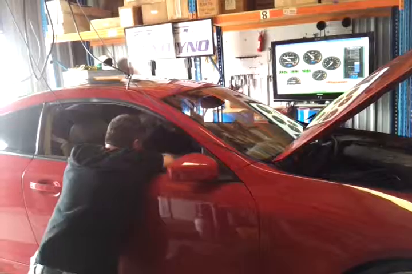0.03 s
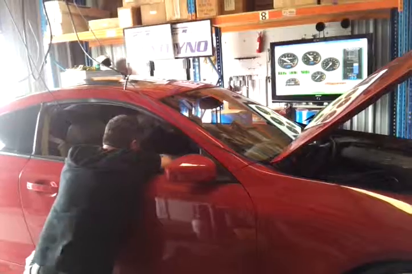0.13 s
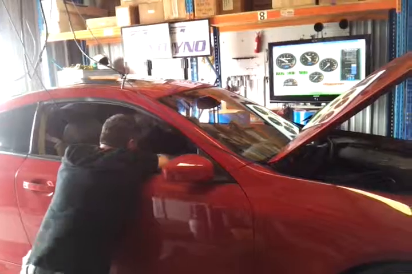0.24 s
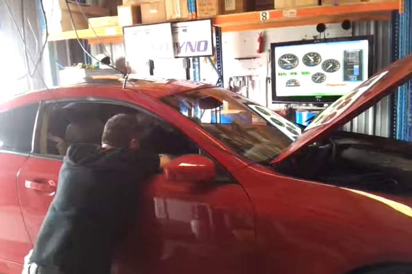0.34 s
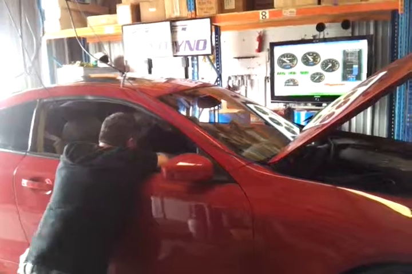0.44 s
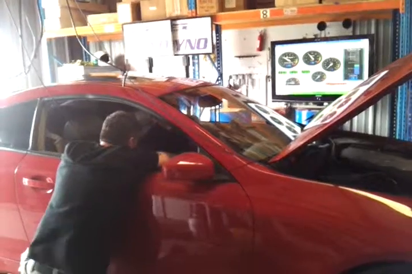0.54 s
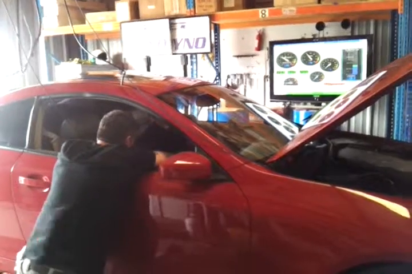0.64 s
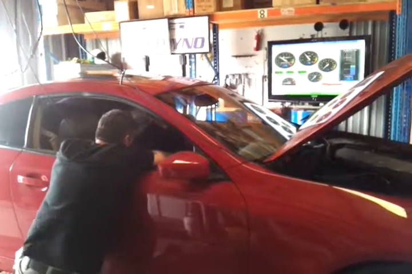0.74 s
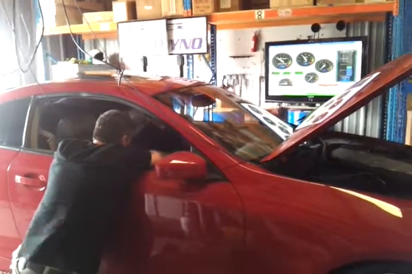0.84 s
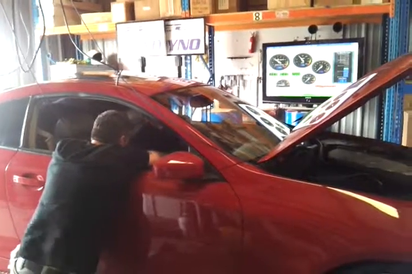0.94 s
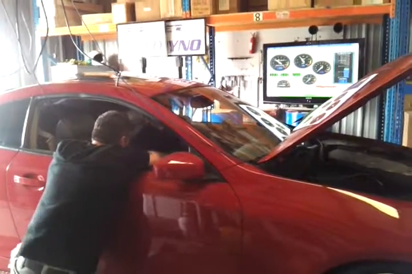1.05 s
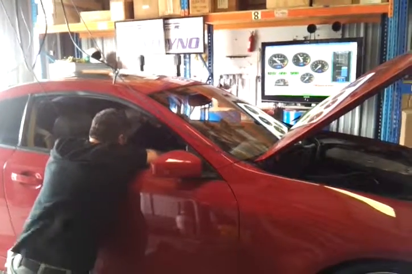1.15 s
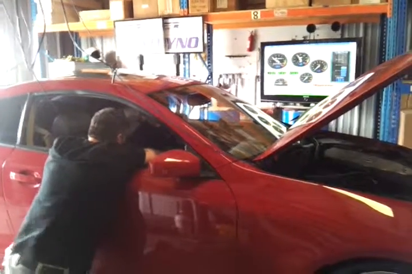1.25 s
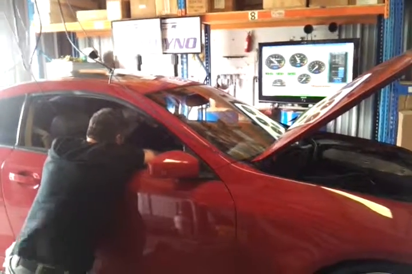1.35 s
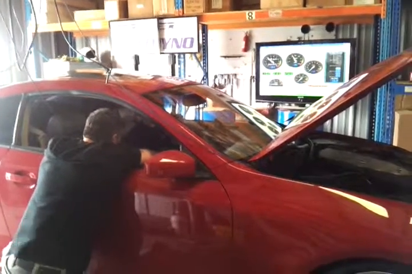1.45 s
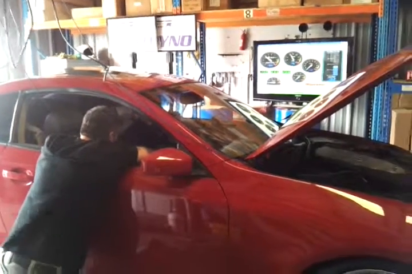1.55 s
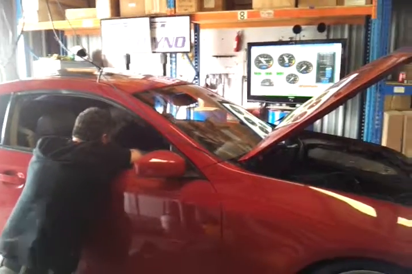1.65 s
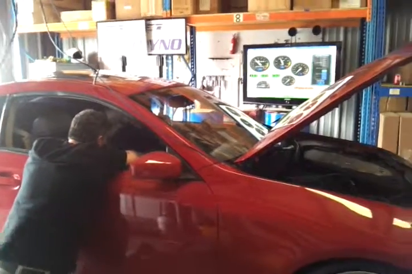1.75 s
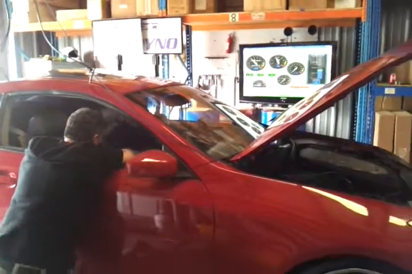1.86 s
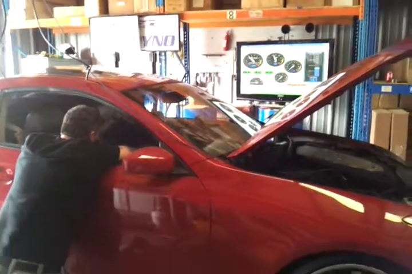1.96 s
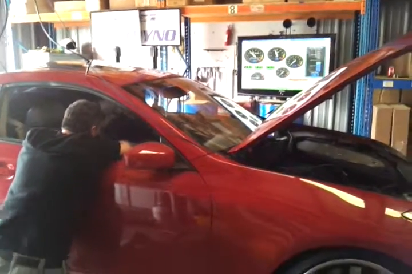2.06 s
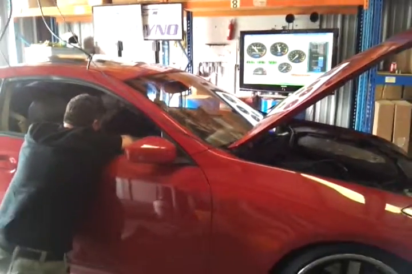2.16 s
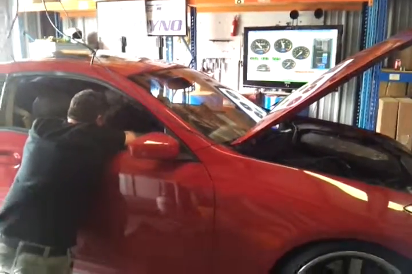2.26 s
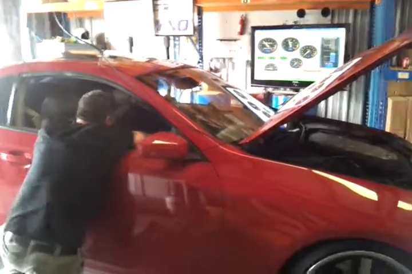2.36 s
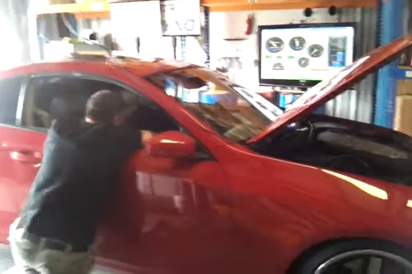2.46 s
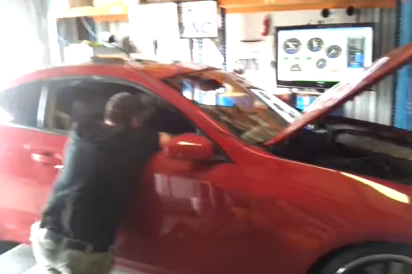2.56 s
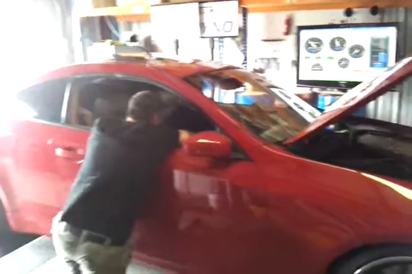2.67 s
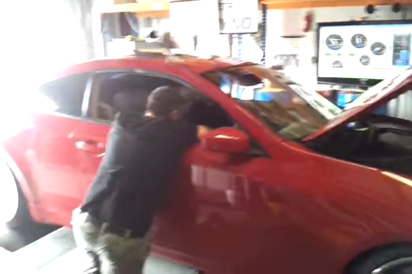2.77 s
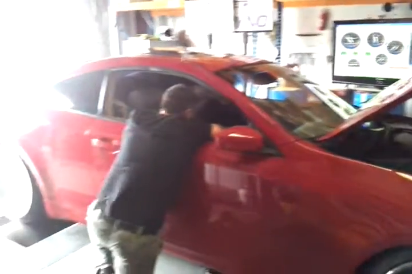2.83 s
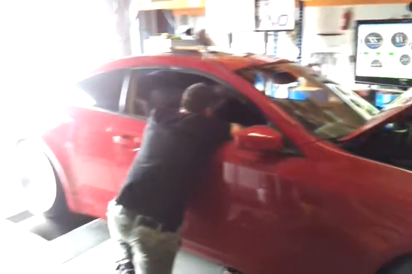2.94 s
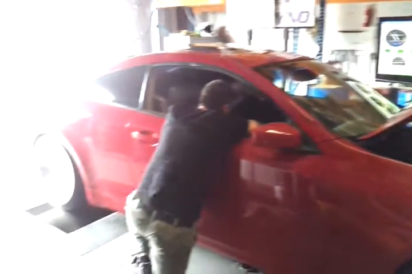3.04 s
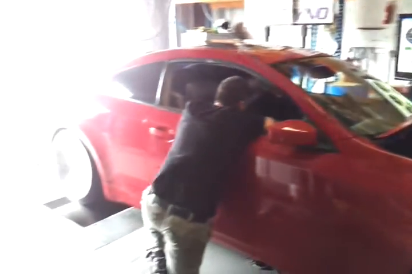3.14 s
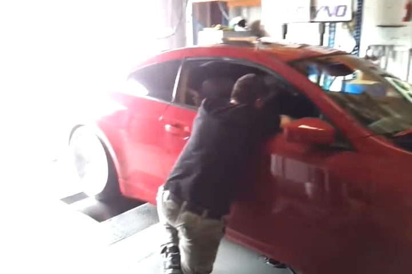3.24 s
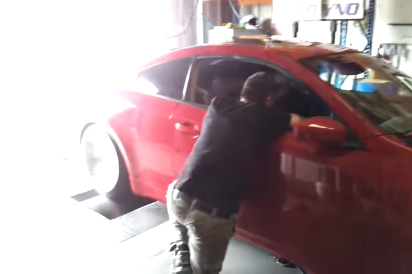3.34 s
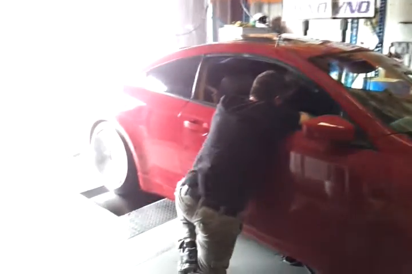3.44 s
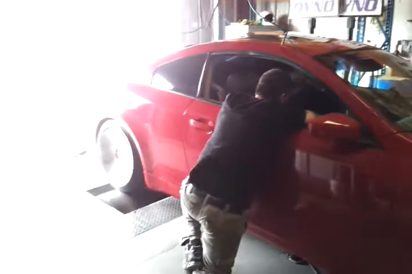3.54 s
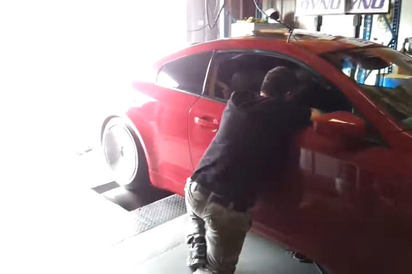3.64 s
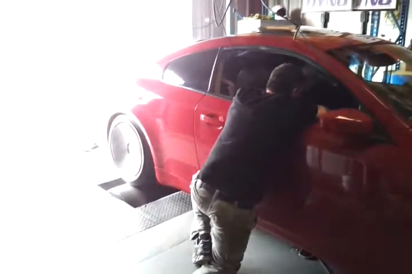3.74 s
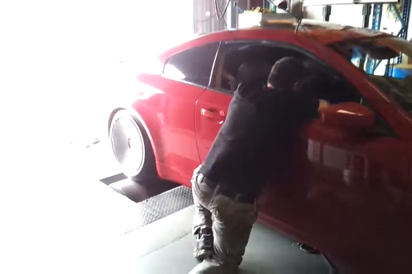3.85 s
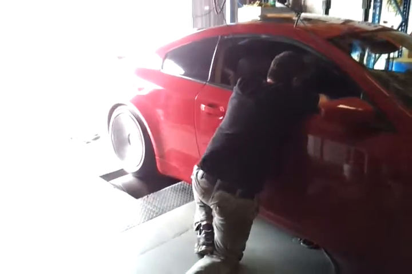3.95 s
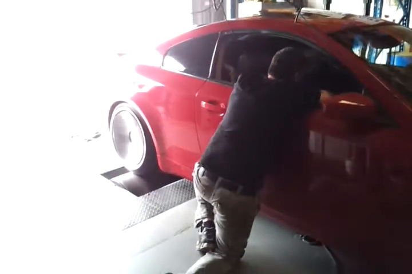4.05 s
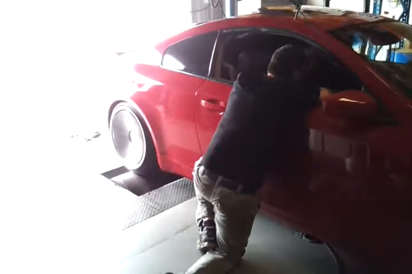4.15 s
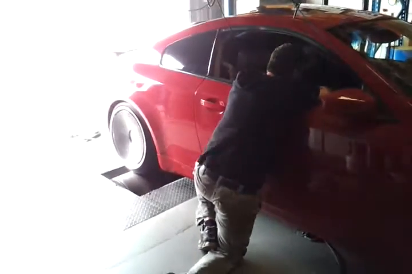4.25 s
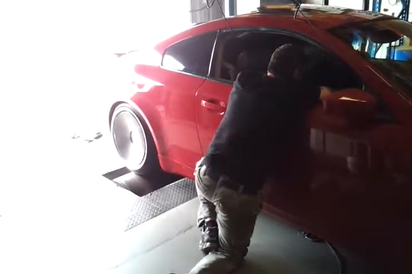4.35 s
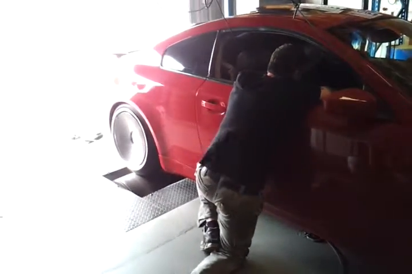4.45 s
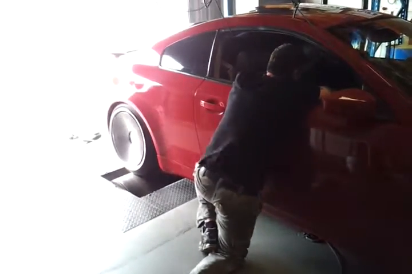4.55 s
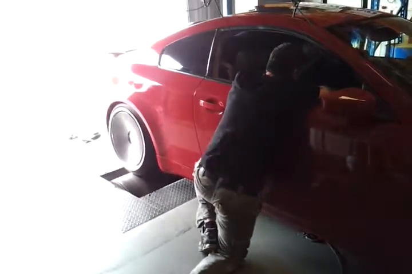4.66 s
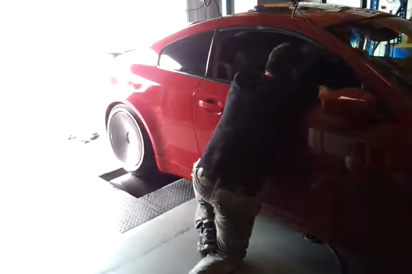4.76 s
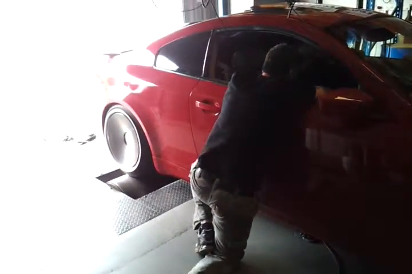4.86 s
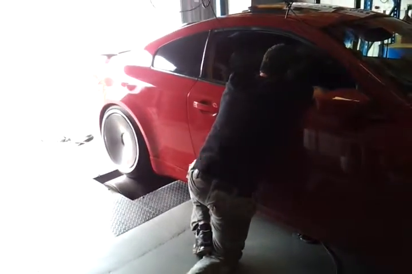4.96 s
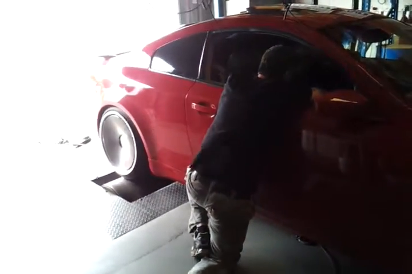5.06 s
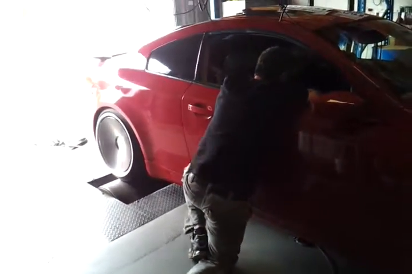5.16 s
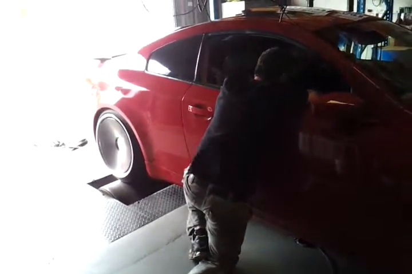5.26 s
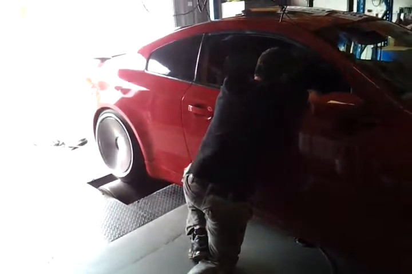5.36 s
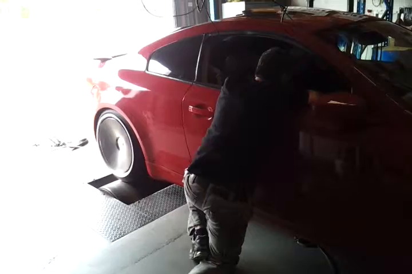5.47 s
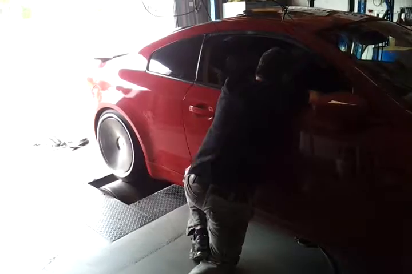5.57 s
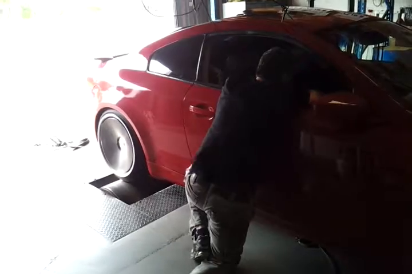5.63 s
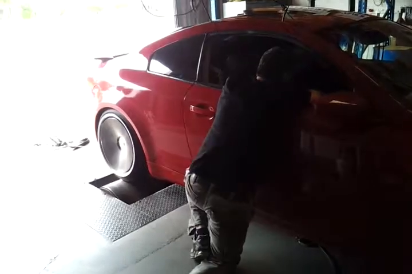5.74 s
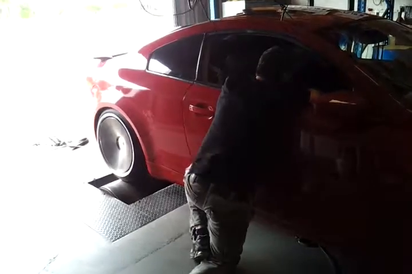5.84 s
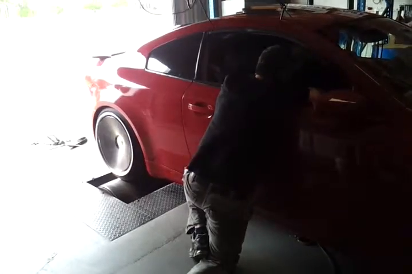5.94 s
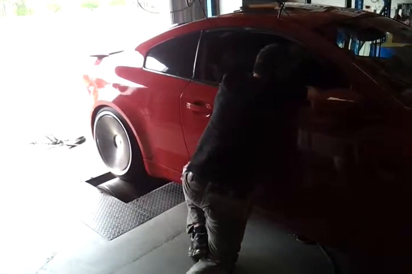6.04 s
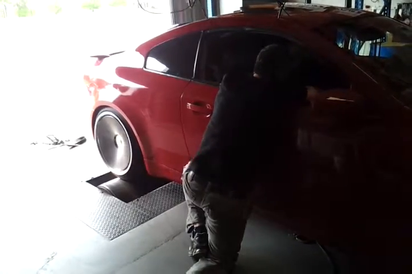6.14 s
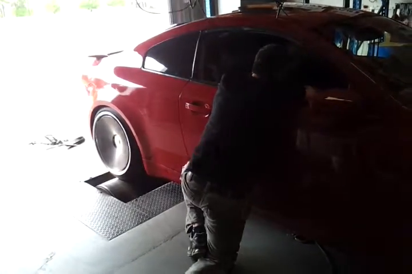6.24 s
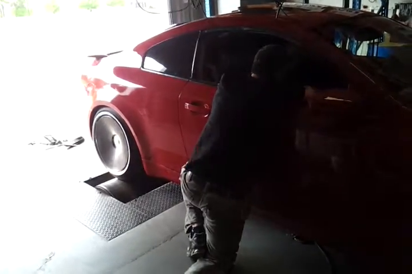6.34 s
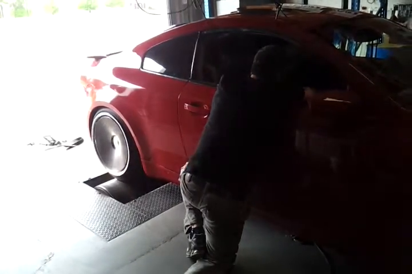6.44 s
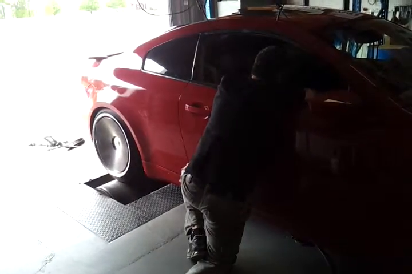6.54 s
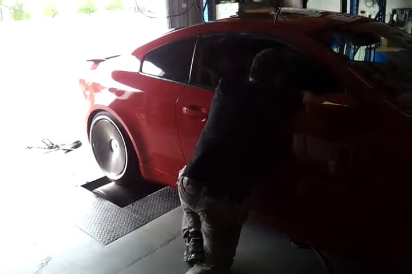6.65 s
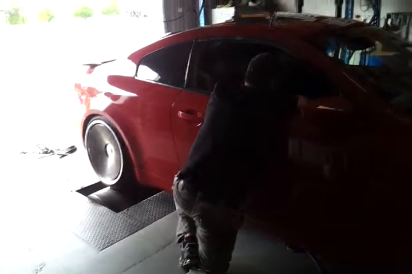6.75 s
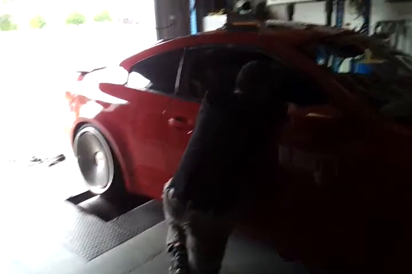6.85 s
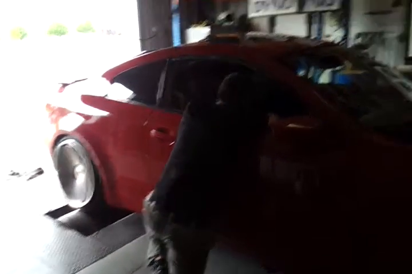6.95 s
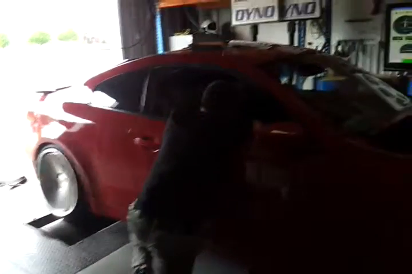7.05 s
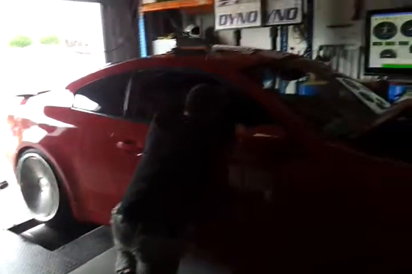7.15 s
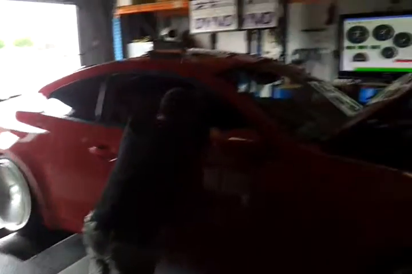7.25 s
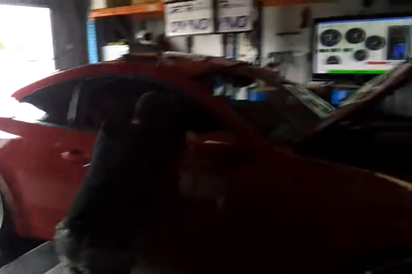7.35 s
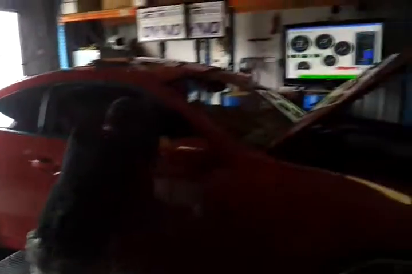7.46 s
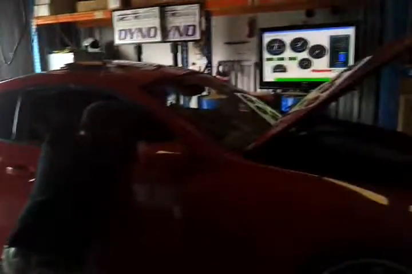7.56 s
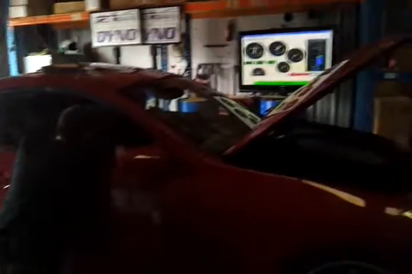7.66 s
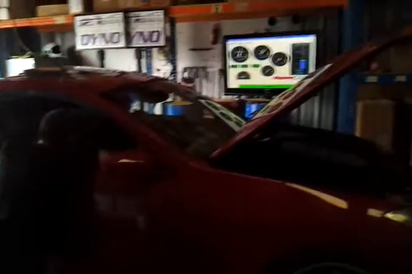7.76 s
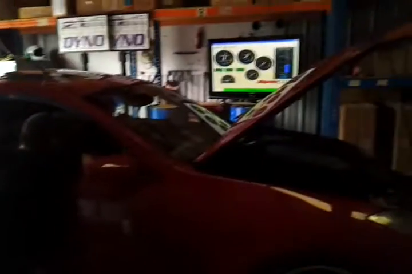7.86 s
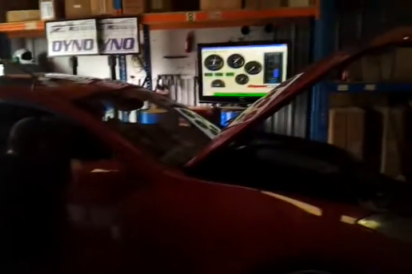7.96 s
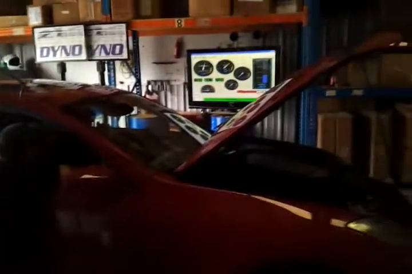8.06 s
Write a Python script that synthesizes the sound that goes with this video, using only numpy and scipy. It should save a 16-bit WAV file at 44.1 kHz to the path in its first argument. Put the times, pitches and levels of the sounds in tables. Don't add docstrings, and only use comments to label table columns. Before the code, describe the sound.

One continuous engine pull on a roller test bed, heard close in a reverberant garage. After a silent opening it fades in quickly, then rises steadily in pitch at constant, crushing loudness. The exhaust note is buzzy and uneven, its harmonics fluttering and shifting, with rough rumbling surges and a hissing roar near the end. The cheap microphone clips hard, narrow and gritty; the engine is still climbing at the cutoff.

```python
import sys
import numpy as np
from scipy import signal
from scipy.fft import rfft, irfft, next_fast_len
from scipy.io import wavfile
from scipy.ndimage import uniform_filter1d, map_coordinates

SR = 44100
rng = np.random.default_rng(int(sys.argv[2]) if len(sys.argv) > 2 else 0)


def int16_out(signal):
    q = np.round(np.clip(np.atleast_2d(signal).T, -1, 1) * 32767)
    wavfile.write(sys.argv[1], SR, q.astype(np.int16))


def ratio_of_db(decibels):
    return 10 ** (np.asarray(decibels, float) / 20)


N = 357210


def exhaust(cycles):
    # (order, level [dB], change over the pull [dB])
    cycle_orders = [(1, -10.5, -0.5), (2, -28, 5), (3, -19, 10.5), (4, -23, -12), (5, -40, 33.5),
                    (6, -2, 1), (7, -12, -8), (8, -29, -6.5), (9, -29, 20), (10, -26.5, 8.5),
                    (11, -42.5, 33.5), (12, -.5, 2.5), (13, -26, 9.5), (14, -26.5, 9), (15, -6, -11.5),
                    (16, -15, -20.5), (17, -20.5, -16), (18, -2, -4.5), (19, -17, -12.5), (20, -19, 5),
                    (21, -18, -0.5), (24, -15.5, 7.5), (27, -21.5, 11.5), (30, -19.5, 13.5),
                    (36, -22.5, 9.5), (42, -15, 4.5), (45, -13.5, -0.5), (66.34, -19, -7),
                    (69.5, -13, -3.5)]
    # (order, time [s], half length [s], change [dB])
    swings = [(6, 0.82, .15, -1.5), (6, 1.38, 0.12, 2), (6, 2.72, 0.16, -9.5), (6, 4.2, 0.16, 4),
              (6, 5.75, 0.17, 4.5), (12, 1.65, 0.21, -3.5), (12, 2.65, 0.18, 2.5), (12, 5.0, 0.22, 4),
              (12, 5.2, 0.11, -10), (12, 5.72, .15, -1.5), (12, 6.1, .15, 2.5), (12, 6.36, .06, 6.5),
               (12, 7.85, 0.23, 8.5), (13, 3.4, 0.17, 8.5), (13, 4.3, 0.18, 13.5), (15, 1.28, .12, -20.5),
              (15, 1.85, 0.26, 5), (15, 6.2, 0.39, -17), (15, 7.0, 0.12, 11), (18, 0.797, 0.13, -4),
              (18, 1.54, 0.23, -5), (18, 2.34, 0.14, -18), (18, 2.8, .12, -22), (18, 3.23, 0.39, 8),
              (18, 3.87, 0.089, -4), (18, 5.2, 0.21, 7), (18, 6.2, 0.1, 13.5), (18, 6.42, .12, -16),
              (24, 2.2, 0.39, 10), (24, 6.88, .12, -7)]
    progress = np.arange(N) / N
    tones = np.zeros(N)
    for order, start_db, change_db in cycle_orders:
        whole_order = round(order)
        swing_db = swells([row[1:] for row in swings if round(row[0]) == whole_order])
        flutter_db = (0.6 + 0.08 * max(order - 18, 0)) * wobble(14)
        level = ratio_of_db(start_db + change_db * progress + swing_db + flutter_db)
        turns = whole_order * cycles + rng.random() + 0.008 * wobble(30)
        tones += level * np.sin(2 * np.pi * turns)
    return np.sqrt(2) * filtered(tones, workshop)


def crank_cycles():
    # (time [s], firing rate [Hz])
    revs = [(.75, 179.6), (1.75, 196), (2.75, 212), (4.6, 244.6), (5.6, 261.3), (6.6, 279), (7.2, 288.4),
            (7.65, 295.1), (8.1, 302.2)]
    firing_hz, = curves(revs)
    shiver = 1 + 0.0004 * wobble(25)
    return np.cumsum(firing_hz * shiver) / (6 * SR)


def roar(cycles):
    # (frequency [Hz], level per Hz [dB])
    roar_colour = [(300, -120), (600, -12), (1000, -10.5), (2000, -1.5), (3000, -4), (5000, -7),
                   (7000, -10), (12000, -23)]
    rumble_colour = [(15, -20), (40, -25), (100, -6.5), (200, -3.5), (400, 8), (700, 4.5), (1000, -120)]
    # (time [s], half length [s], change [dB])
    shudders = [
        (.95, 0.41, 5.5),
        (2.8, 0.42, 9),
        (3.7, 0.74, 7.5),
        (5.75, 0.14, 1),
        (6.1, .15, -13),
        (6.65, .3, 8),
        (8.1, 0.43, 13),
    ]
    shudder_db = swells(shudders)
    late_rise = (np.arange(N) / N) ** 4.55
    roar_db = -13 + 8 * late_rise + 0.11 * shudder_db
    rumble_db = -29.5 + shudder_db
    puff = 1 + 0.5 * np.cos(2 * np.pi * 6 * cycles)
    hiss = unit(filtered(puff * rng.standard_normal(N), lambda hz: ratio_of_db(along(roar_colour, hz))))
    rumble = unit(filtered(rng.standard_normal(N),
                           lambda hz: ratio_of_db(along(rumble_colour, hz)) * (0.45 + workshop(hz))))
    return ratio_of_db(roar_db + 1.2 * wobble(12)) * hiss + ratio_of_db(rumble_db + 2.5 * wobble(5)) * rumble


def workshop(hz):
    # (frequency [Hz], width [Hz], level [dB], polarity [-1 or 1])
    standing_waves = [(141, 8.7, -17, 1), (192.1, 7.6, -18, 1), (248.6, 9.6, -1.5, 1), (277.7, 10.7, -2, 1),
                      (319.8, 6.8, -3.5, 1), (368.8, 14, -12.5, 1), (391, 7.7, -13.5, 1),
                      (425, 7.35, 1, -1), (444.3, 13.1, -10, 1), (478.5, 32.6, -5.5, 1),
                      (526.05, 16.4, -1.2, 1), (542.8, 6.3, 1, -1), (578.2, 14.4, -5, -1),
                      (623.6, 12, -21, -1)]
    # (frequency [Hz], width [Hz], share cancelled [dB])
    nulls = [(509.6, 7.95, -3), (551.8, 3.1, -8), (594.7, 7, -4.5)]
    # (frequency [Hz], width [Hz], level [dB])
    pipe_rings = [(981, 54, -11.5), (1099.5, 34, -11.5), (1313, 14, -6.5), (1545, 31, -7.5),
                  (1586, 17.8, -2.5), (2100, 37, -9.5), (2272, 19.6, -6.5)]
    room = resonances(hz, standing_waves) * (1 - resonances(hz, nulls))
    direct = ratio_of_db(-19) + resonances(hz, pipe_rings, order=2)
    return room + (hz > 660) * direct


def resonances(hz, modes, order=1):
    total = 0
    for centre, width, db, *side in modes:
        damping = 1j * hz * width
        ring = damping / (centre * centre - hz * hz + damping)
        total = total + ratio_of_db(db) * np.sign(np.prod(side)) * ring ** order
    return total


def swells(rows):
    if not rows:
        return 0
    t = np.arange(0, N, 64) / SR
    bells = sum(db * np.exp(-((t - s) / half_s) ** 2) for s, half_s, db in rows)
    return np.interp(np.arange(N) / SR, t, bells)


def wobble(rate):
    knots = rng.standard_normal(int(N * rate / SR) + 4)
    return map_coordinates(knots, [np.arange(N) * rate / SR], order=1)


def curves(rows):
    s, *cols = np.transpose(rows)
    return [np.interp(np.arange(N) / SR, s, c) for c in cols]


def along(points, hz):
    f, v = np.transpose(points)
    return np.interp(np.log(hz + 1), np.log(f + 1), v)


def filtered(x, response):
    m = next_fast_len(N + SR // 2)
    return irfft(rfft(x, m) * response(np.fft.rfftfreq(m, 1 / SR)), m)[..., :N]


def unit(x):
    return x / np.sqrt(np.mean(x ** 2) + 1e-20)


def clipped(x, top, hard):
    return x / (1 + np.abs(x / top) ** hard) ** (1 / hard)


def overloaded(x, top, hard, settle_s):
    size = round(settle_s * SR)
    reach = np.sqrt(np.abs(uniform_filter1d(x ** 2, size)))
    bias = np.zeros_like(x)
    for _ in range(3):
        imbalance = uniform_filter1d(uniform_filter1d(np.sign(x - bias), size), size)
        bias = bias + reach * imbalance
    return clipped(x - bias, top, hard)


def scene():
    cycles = crank_cycles()
    return (exhaust(cycles) + roar(cycles))[None]


def low_pass(x):
    return signal.sosfilt(signal.butter(12, 15810, fs=SR, output="sos"), x)


def record(dry):
    # (frequency [Hz], level [dB])
    recorder_band = [(1500, -2), (3000, -2.5), (4500, -4.5), (5500, -3), (6500, -6.5), (7500, -15.5),
                     (8500, -32.5), (9500, -83)]
    # (time [s], gain [0-1])
    fade = [
        (.7503, .17),
        (1.0, 1),
    ]
    square = overloaded(ratio_of_db(30) * dry, top=0.695, hard=8, settle_s=0.05)
    gritty = square + ratio_of_db(-25.5) * rng.standard_normal(N)
    gain, = curves(fade)
    started = np.arange(N) / SR > fade[0][0]
    faded = gritty * gain * started
    narrow = filtered(faded, lambda hz: ratio_of_db(along(recorder_band, hz) - recorder_band[0][1]))
    ceiling = 0.725
    return low_pass(np.clip(narrow, -ceiling, ceiling))


dry = scene()
out = record(dry)
int16_out(out)
```